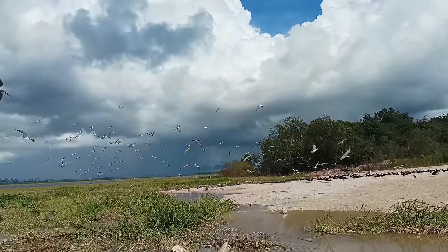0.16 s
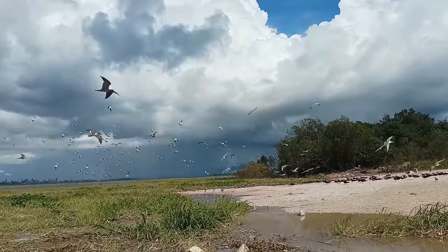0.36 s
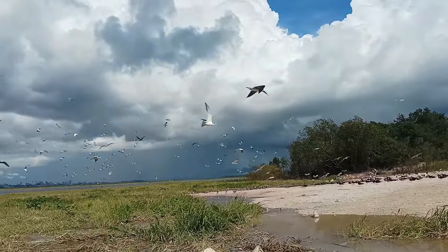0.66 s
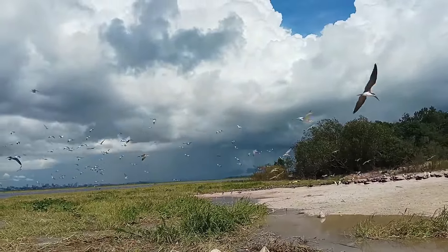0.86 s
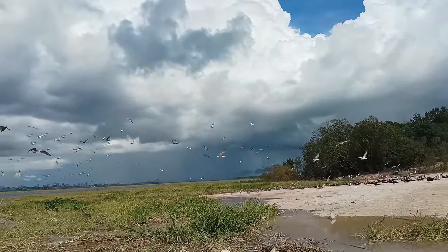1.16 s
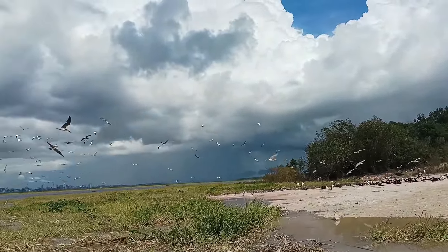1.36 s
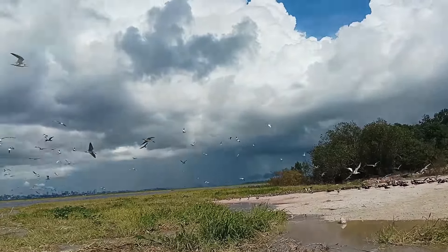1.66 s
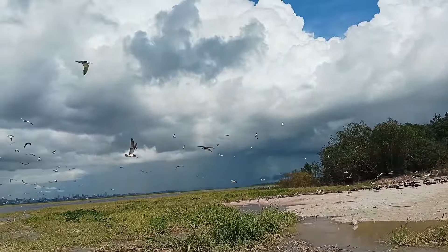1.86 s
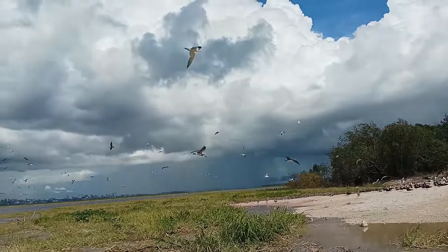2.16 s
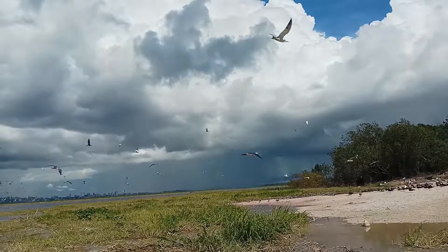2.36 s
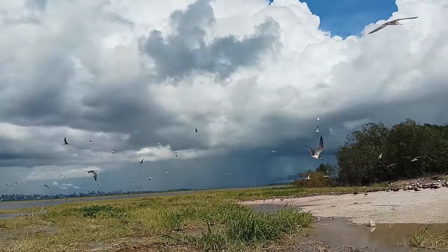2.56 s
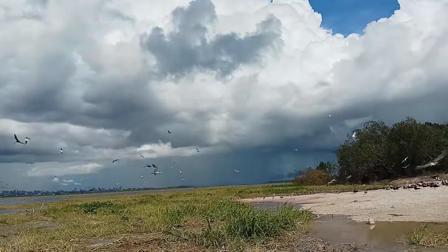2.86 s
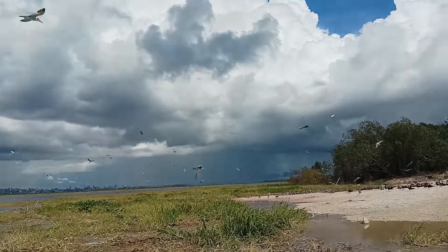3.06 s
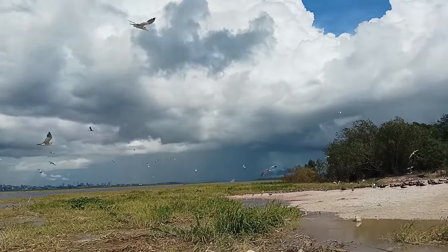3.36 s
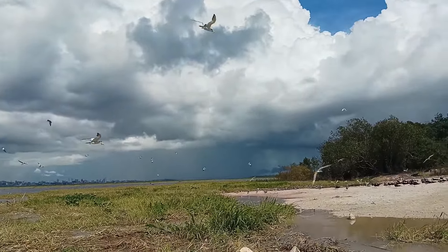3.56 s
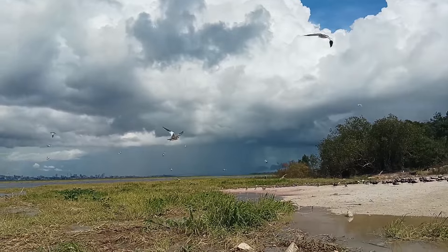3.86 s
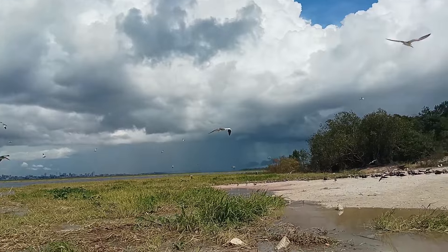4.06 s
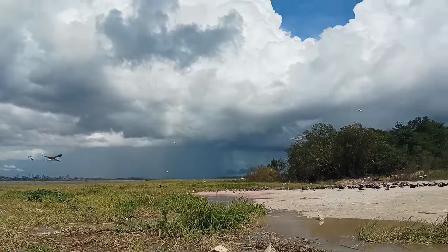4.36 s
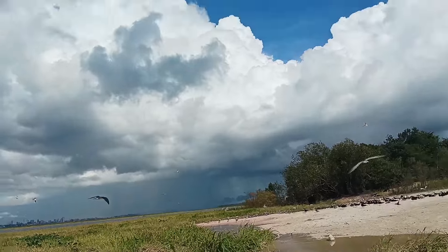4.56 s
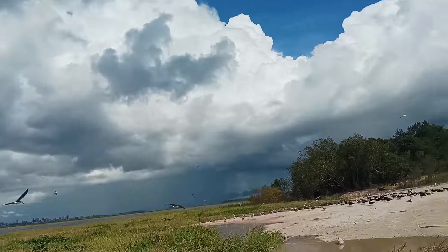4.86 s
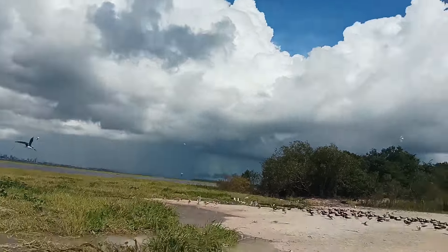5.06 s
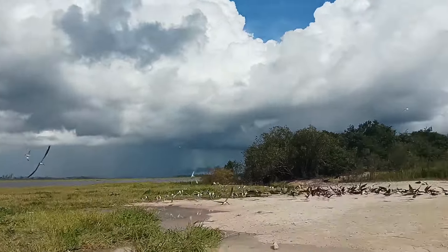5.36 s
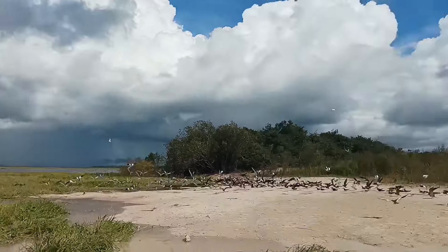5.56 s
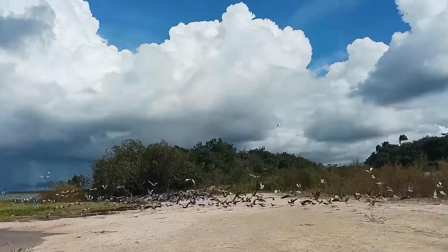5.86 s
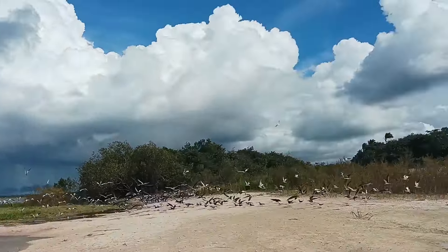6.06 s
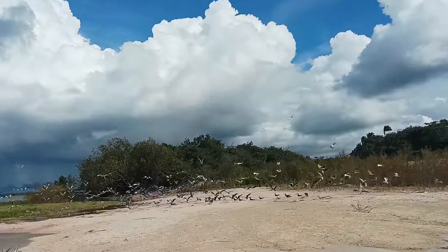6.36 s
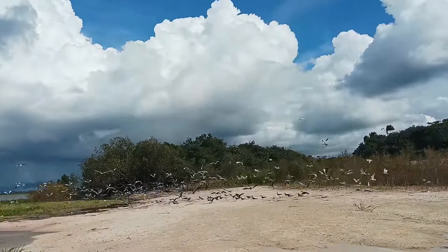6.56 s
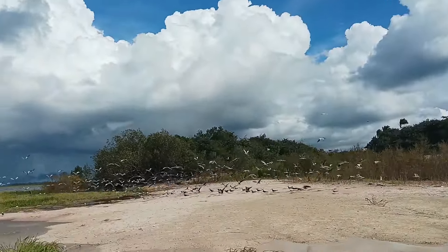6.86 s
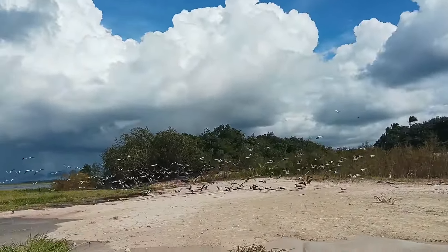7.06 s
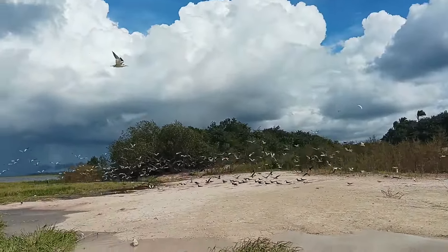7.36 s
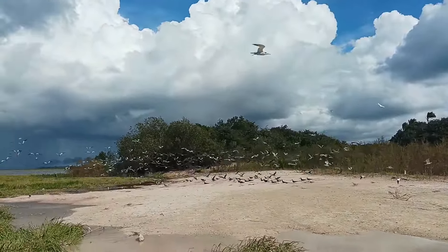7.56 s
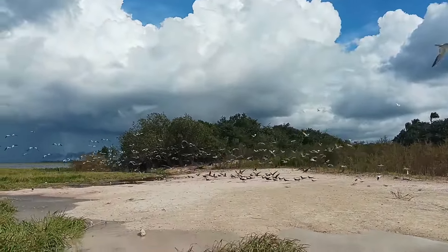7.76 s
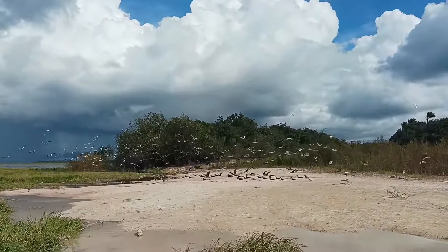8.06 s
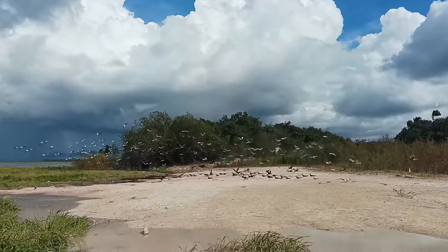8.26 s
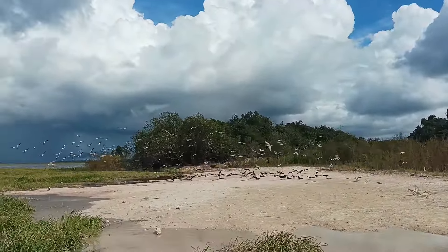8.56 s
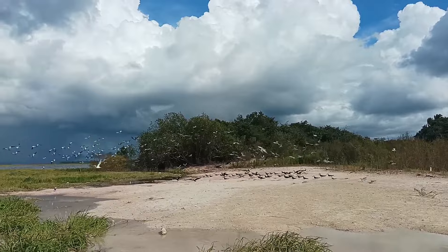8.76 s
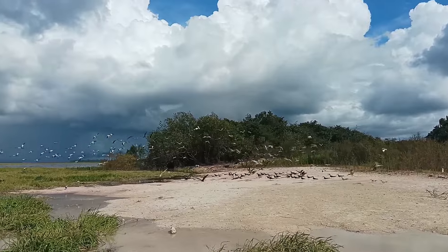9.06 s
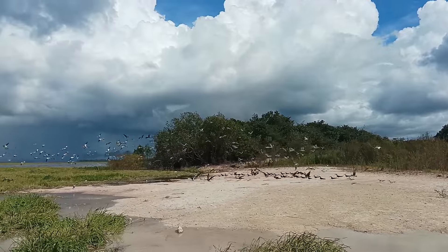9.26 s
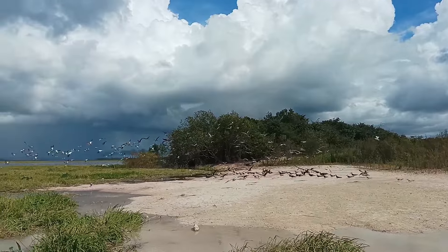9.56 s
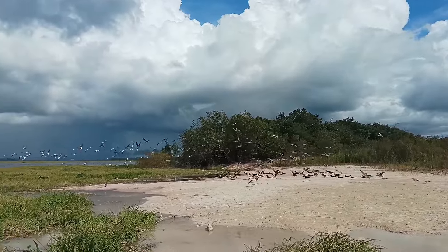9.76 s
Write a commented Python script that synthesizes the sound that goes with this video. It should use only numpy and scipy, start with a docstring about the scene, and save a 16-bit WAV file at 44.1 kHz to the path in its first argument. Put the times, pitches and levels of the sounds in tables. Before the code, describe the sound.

An open, almost echo-free river bank with a flock of terns and waterbirds, about ten seconds. Wind rumbles low throughout in irregular gusts, with dull thumps on the microphone. Over it come short thin whistles around 4 kHz, slightly lower pipes, nasal cries near 1 kHz, hoarse rising yelps and faint distant calls. Wavering whistles glide up and down at 0.3, 0.8, 1.1, 1.5 and 2.3 s. From 3 to 5 s whistles get busier, with strong wavering calls at 4.1 and 4.7 s, while buffeting peaks from 3.6 to 5 s. Dry crackling brushes pass close by at 4.7 and 5.4-6 s, with two soft faint coos around 6 s. Another hard thump lands at 7.2 s, then cries and a wavering call at 8.1 s. A throaty rattle sounds at 9.1-9.4 s amid cries; whistles and wind continue to the end. Faint high insect buzz and hiss lie beneath.

```python
"""Terns and other waterbirds call over an open river bank: pitch arches drive whistles, piping notes and coos,
gliding pitch makes wavering calls, and harmonics through a throat make cries, yelps and a rattle. Fainter
birds, pulsed insect buzzes and a steady hiss of air, all from sines or shaped noise, lie behind. Gusts rumble
as shaped noise and eddies thump as pressure spikes on the microphone; grainy bursts of crackling noise swell
and die away close by."""
import sys
import numpy as np
from scipy import signal
from scipy.fft import rfft, irfft
from scipy.io import wavfile
from scipy.ndimage import uniform_filter1d

SR = 44100
rng = np.random.default_rng(int(sys.argv[2]) if len(sys.argv) > 2 else 0)


def store_wav(level_fs):
    """Save 16-bit WAV to argv[1]."""
    pcm = np.round(np.clip(np.atleast_2d(level_fs), -1, 1) * 32767)
    wavfile.write(sys.argv[1], SR, pcm.T.astype(np.int16))


N = 437031
TIME = np.arange(N) / SR

# Call levels stand before the gain of their kind in near_birds(); pitches before sag and unsteadiness.
# Pitch arches of thin whistles: start_s, length_s, first_hz, top_hz, last_hz,
# top_at (share of the length, held to 0.1-0.9), level_db, overtone_db (second harmonic, relative)
WHISTLE_ARCHES = [(0.023, 0.12, 3900, 4100, 3340, 0.42, -60.5, -49),
                  (0.386, 0.031, 3935, 4030, 3700, 0.3, -46.5, -41),
                  (0.51, 0.17, 3870, 4090, 4020, 0.36, -47, -20),
                  (0.55, 0.21, 4230, 4153, 3680, 0, -53.5, -21),
                  (0.793, 0.2, 4240, 4350, 4030, 0.6, -60, -19),
                  (1.83, 0.098, 3880, 4090, 3840, 1, -43.5, -10),
                  (1.958, 0.051, 3720, 4180, 4450, 1, -50.5, -42),
                  (2.093, 0.11, 4220, 4340, 4100, 0.22, -54, -19),
                  (2.178, 0.14, 3989, 4180, 3600, 0.6, -49, -14.5),
                  (2.634, 0.16, 4100, 4120, 3845, 0.28, -54.5, -37),
                  (3.268, 0.39, 3850, 4680, 3946, 0.34, -45, -11),
                  (3.466, 0.13, 4080, 4430, 4130, 0.2, -49, -12),
                  (3.64, 0.17, 4090, 4290, 3990, 0.23, -54.5, -4.5),
                  (3.754, 0.14, 4100, 4060, 3720, 0, -46.5, -9),
                  (3.937, 0.074, 4190, 4280, 3680, 0.47, -57, -16),
                  (4.09, 0.35, 3780, 4240, 4180, 0.1, -66, -10),
                  (4.788, 0.29, 4090, 4714, 4060, 0.23, -48.5, -10.5),
                  (5.041, 0.062, 4410, 4330, 3820, 0.37, -49, -9),
                  (5.215, 0.18, 4150, 4470, 3960, 0.3, -48, -5.5),
                  (5.299, 0.056, 4170, 4150, 3760, 0.6, -44, -9.5),
                  (6.191, 0.073, 3850, 4290, 3850, 0.8, -56.5, -10),
                  (6.355, 0.31, 3950, 4120, 3670, 0.3, -62.5, -14),
                  (6.63, 0.32, 4010, 4660, 4180, 0.34, -58, -16),
                  (6.811, 0.04, 3955, 4120, 3570, 1, -51.5, -3.5),
                  (6.974, 0.15, 3940, 4760, 4600, 1, -65.5, -10),
                  (7.127, 0.18, 4110, 3950, 3230, 0.1, -52, -11.5),
                  (7.724, 0.095, 4230, 4290, 3860, 0.2, -60, -15),
                  (8.388, 0.05, 4380, 4390, 4130, 0.3, -54.5, -26),
                  (8.507, 0.052, 3860, 4160, 3640, 0.5, -42, -13),
                  (8.636, 0.16, 3740, 4290, 3580, 0.8, -53, -10.5),
                  (8.793, 0.21, 4030, 3985, 3450, 0.2, -52, -6),
                  (9.044, 0.12, 4165, 4500, 3760, 0.15, -60, -24),
                  (9.472, 0.11, 4340, 4440, 4130, 1, -57.0, -29),
                  (9.66, 0.24, 3930, 4410, 4140, 1, -52.5, -12.5)]
# Pitch arches of piping notes: start_s, length_s, first_hz, top_hz, last_hz, top_at (share), level_db, overtone_db
PIPE_ARCHES = [(0.343, 0.028, 2820, 2880, 2730, 1, -45, -13),
               (0.391, 0.061, 3047, 3110, 2470, 0.12, -55.5, -16),
               (0.49, 0.035, 2750, 2670, 2215, 0.1, -52.5, -26),
               (1.36, 0.048, 2710, 2940, 2920, 1, -46.5, -15.5),
               (1.935, 0.026, 3100, 3093, 2186, 0.058, -46.5, -18),
               (3.191, 0.048, 2700, 3320, 3700, 0.76, -41, -7.5),
               (3.33, 0.13, 3200, 3360, 3210, 0.28, -53, -32),
               (3.629, 0.062, 2960, 3020, 2370, 0.068, -48.5, -13),
               (3.88, 0.058, 2685, 3100, 3000, 1, -54.5, -17),
               (5.021, 0.093, 2740, 3170, 3120, 1, -51.5, -13),
               (5.124, 0.045, 3030, 3030, 2700, 0.13, -50.5, -7),
               (5.55, 0.043, 2770, 3040, 2800, 0.83, -48, -26),
               (8.5, 0.23, 3200, 3180, 2230, 0.071, -57, -8.5),
               (8.875, 0.057, 3300, 3470, 3300, .55, -47.5, -20),
               (9.439, 0.3, 2895, 3090, 3130, 0.2, -61, -21),
               (9.722, 0.076, 2850, 2810, 2880, 0.9, -60.5, -15)]
# Pitch arches of low, soft coos: start_s, length_s, first_hz, top_hz, last_hz, top_at (share), level_db, overtone_db
COO_ARCHES = [(5.9, .09, 609, 638, 564, 0.44, -57, -34), (6.13, .07, 612, 633, 635, 0.55, -54, -29)]
# Pitch arches of nasal cries: start_s, length_s, first_hz, top_hz, last_hz, top_at (share), level_db,
# overtone_db (sets the upper harmonics in throat())
CRY_ARCHES = [(0.09, 0.25, 1118, 1176, 1050, 0.83, -56, -4), (0.375, 0.057, 1050, 1022, 974, 0.1, -61, -3),
              (0.58, 0.29, 1080, 1084, 1072, 0.11, -65.5, -5.5),
              (1.64, 0.082, 1090, 1204, 1020, 0.5, -59.5, -0.5),
              (1.96, 0.13, 1140, 1108, 976, 0.3, -58, -8), (2.076, 0.041, 798, 896, 870, 0.93, -50.5, -11),
              (2.109, 0.084, 1032, 1138, 1007, 0.65, -45, -16), (2.22, 0.1, 787, 883, 880, 0.86, -59.5, -9),
              (2.322, 0.12, 1080, 1123, 1037, 0.19, -47.5, -13.5),
              (2.75, 0.1, 1005, 1173, 835, 0.66, -56, -9), (2.92, 0.27, 1054, 1100, 849, 0.2, -57.5, -8),
              (3.25, 0.28, 1080, 1093, 910, 0.14, -58, -3), (3.49, 0.083, 1124, 1190, 1110, 0.7, -58.5, 2),
              (3.7, 0.22, 1137, 1142, 1070, 0.33, -61.5, -5),
              (5.729, 0.22, 1189, 1184, 1112, 0.16, -56, -11),
              (6.951, 0.066, 1197, 1314, 1320, 1, -62, -0.5),
              (7.3, 0.071, 1096, 1182, 1030, 0.69, -51, -10.5),
              (7.401, 0.097, 795, 963, 964, 0.98, -57.5, -11),
              (7.49, 0.23, 1139, 1154, 1032, 0.47, -51, -9.5),
              (8.872, 0.09, 1097, 1175, 1004, 0.56, -56.5, -2),
              (9.012, 0.075, 830, 972, 950, 1, -55.5, -8.5),
              (9.08, 0.27, 1133, 1168, 1048, 0.084, -58.5, 3),
              (9.33, 0.22, 1266, 1274, 1110, 0.17, -54.5, 1.5)]
# Short hoarse yelps that rise: start_s, length_s, final_hz, level_db, overtone_db (as for the cries)
YELPS = [(0.017, 0.054, 1028, -61.5, -9), (0.255, 0.0282, 1150, -52.5, -1), (0.824, 0.057, 690, -54.5, -9),
         (1.077, 0.03, 1196, -54, -5.5), (1.497, 0.023, 1108, -41, -20), (1.92, 0.029, 1096, -58, -15),
         (3.462, 0.027, 1081, -49.5, -21), (4.986, 0.032, 1037, -59, -4), (5.176, 0.038, 1120, -61, 5.5),
         (5.285, 0.017, 1058, -60.5, 4.5), (5.865, 0.051, 644, -61, -30), (6.021, 0.016, 492, -64, -30),
         (6.088, 0.034, 347, -62.5, -41), (6.148, 0.047, 799, -63.5, -6.5), (6.793, 0.011, 1056, -60.5, -1),
         (7.283, 0.035, 988, -60, -5), (8.423, 0.017, 1180, -56.5, -21), (8.491, 0.017, 1050, -58, 3.5),
         (8.853, 0.032, 963, -53.5, -10)]
# Long unbroken calls through several turns: overtone_db (mean octave level), [(time_s, pitch_hz, level_db), ..]
WAVERING_CALLS = [(-77, [(0.283, 4130, -39.5), (0.335, 4660, -50), (0.4, 4180, -55), (0.48, 4420, -58.5),
                  (0.6, 4160, -49)]), (-64.5, [(0.79, 2700, -48), (0.9, 3470, -82), (0.972, 2840, -67),
                  (1.065, 3200, -69), (1.14, 2560, -53), (1.21, 2330, -57)]), (-78, [(1.112, 4080, -42),
                  (1.16, 4530, -46), (1.24, 4300, -57.5), (1.29, 4430, -55), (1.35, 4120, -48),
                  (1.41, 3950, -52)]), (-62, [(1.525, 4570, -42), (1.555, 4530, -46), (1.605, 3810, -51.5),
                  (1.71, 4520, -51), (1.81, 3910, -47)]), (-58, [(2.325, 2714, -41), (2.395, 3470, -51),
                  (2.495, 2780, -57), (2.59, 3450, -66), (2.66, 2575, -45.5), (2.712, 2300, -45)]),
                  (-59.5, [(4.085, 2575, -45.5), (4.115, 2970, -34), (4.168, 3420, -63), (4.245, 2780, -54),
                  (4.335, 3300, -64), (4.4, 2480, -46), (4.46, 2190, -52.5)]), (-50, [(4.668, 2780, -40),
                  (4.695, 3220, -32), (4.715, 3650, -56), (4.742, 2890, -39), (4.775, 3220, -54)]),
                  (-61, [(5.43, 4040, -47), (5.525, 4410, -50), (5.62, 3880, -46.5), (5.68, 4030, -52),
                  (5.745, 3590, -53), (5.92, 3320, -63)]), (-58.5, [(6.53, 2880, -43), (6.577, 3276, -47),
                  (6.607, 2770, -52), (6.635, 2980, -52)]), (-88, [(6.68, 3060, -64), (6.78, 3010, -62.5),
                  (6.88, 2990, -59), (6.96, 2900, -58)]), (-86, [(7.73, 2790, -57), (7.82, 2900, -67),
                  (7.935, 2690, -69), (7.975, 2910, -50), (8, 3170, -71), (8.04, 2870, -74),
                  (8.09, 2940, -63)]), (-58, [(8.1, 2645, -43), (8.17, 3440, -62), (8.24, 2770, -60),
                  (8.33, 3400, -68), (8.39, 3130, -52), (8.425, 2510, -57), (8.48, 2350, -57)])]
# One long rattling call: start_s, length_s, first_hz, top_hz, last_hz, top_at (share), level_db
RATTLE_ARCH = (9.12, .27, 900, 968, 830, .7, -49)
# Resonance of the throat of the crying, yelping and rattling birds: frequency_hz, gain_db
THROAT_RESPONSE = [(600, -13.5), (1100, -13), (1600, 1), (2150, 2.5), (2700, -2.5), (3400, -2.5),
                   (4400, -11.5), (5700, -1.5), (7000, -10.5), (8200, -20.5), (10000, -24), (11500, -43)]
# How well a whistled pitch carries, relative within a call: pitch_hz, gain_db
PITCH_CARRY = [(2200, 2.5), (2500, -4.5), (2900, -2), (3400, -3.5), (3700, -1), (4050, 3), (4300, 2),
               (4550, 5.5), (4800, -2)]
# Spectrum of the wind rumble, relative: frequency_hz, density_db (per Hz)
RUMBLE_SPECTRUM = [(25, -32), (60, -2.5), (95, 4.5), (190, 2.5), (300, -5.5), (450, -25.5), (700, -55),
                   (2000, -100)]
# Steady breeze between the gusts, before wind() shapes it: time_s, level_db
BREEZE_LEVEL = [(0, -33), (.58, -51), (1.3, -28), (1.72, -42), (2.7, -32), (3.5, -36.5), (4.3, -32),
                (5.3, -33), (6, -36), (7, -36), (7.7, -35), (8.9, -34.5), (9.45, -47.5), (9.9, -24.5)]
# Gusts on the microphone, before wind() shapes them: start_s, length_s, level_db
GUST_EVENTS = [(0, 0.18, -26), (0.446, 0.042, -28), (0.645, 0.084, -31), (0.772, 0.082, -26.5),
               (1.1, 0.084, -29.5), (1.464, 0.12, -27), (1.785, 0.037, -34), (1.892, 0.1, -25.5),
               (2.113, 0.11, -26), (2.295, .2, -27), (2.697, 0.25, -30.5), (2.983, 0.21, -27),
               (3.26, 0.17, -28.5), (3.456, 0.075, -25.5), (3.587, 0.062, -26), (3.688, 0.076, -22),
               (3.783, 0.22, -28), (4.049, 0.11, -24), (4.168, 0.063, -21.5), (4.213, 0.18, -22.5),
               (4.473, 0.31, -21), (4.791, 0.085, -18), (4.864, 0.14, -23.5), (5.04, 0.18, -26),
               (5.269, 0.3, -25), (5.653, 0.1, -27.5), (5.806, 0.063, -24), (6.094, 0.092, -27),
               (6.194, 0.261, -24.5), (6.53, 0.38, -30), (6.8, 0.051, -24.5), (6.921, 0.13, -23.5),
               (7.07, 0.22, -23.5), (7.283, 0.15, -32), (7.558, 0.041, -28.5), (7.796, 0.024, -25),
               (7.878, 0.035, -24), (8.052, 0.18, -30), (8.315, 0.37, -31.5), (8.694, 0.11, -27.5),
               (8.826, 0.24, -26), (9.149, 0.26, -29.5), (9.47, 0.14, -29), (9.622, 0.38, -32.5)]
# Single eddies that hit the microphone, before its bass cut and overload: time_s, peak_db, centre_hz
EDDIES = [(0.099, -10.5, 178), (0.837, -11, 166), (1.096, -16.5, 189), (1.115, -14, 163),
          (1.393, -10.5, 190), (1.547, -10.5, 169), (1.923, -17.5, 249), (2.322, -10, 212),
          (2.404, -12, 233), (2.426, -12.5, 268), (2.492, -9.5, 227), (2.776, -10, 184), (3.022, -7.5, 209),
          (3.072, -7, 267), (3.618, -8.5, 149), (3.69, -5.5, 297.4), (3.902, -4, 166), (3.985, -7.5, 219),
          (4.062, -13, 208), (4.11, -4.5, 214), (4.212, -3.5, 202), (4.35, -7, 270), (4.377, -7, 242),
          (4.476, -9.5, 240), (4.534, -7, 250), (4.605, -7.5, 284), (4.799, -4, 200), (4.864, -1.5, 450),
          (4.967, -8.5, 270), (5.821, -15, 150), (6.109, -16, 248), (6.131, -16.5, 240),
          (6.292, -11.5, 208), (6.346, -14, 220), (6.384, -17, 265), (6.43, -13.5, 283), (6.579, -14, 281),
          (6.637, -11, 210), (6.817, -6, 220), (6.948, -9.5, 216), (7.089, -15, 272), (7.167, -3.5, 230),
          (8.768, -7, 192), (9.048, -10.5, 180)]
# Grainy noise bursts close by, before a common trim: peak_s, rise_s, fall_s (each spans 20 dB), # level_db,
# treble_db (relative to the body)
BURSTS = [(4.69, .085, 0.095, -38, 4), (5.46, 0.07, .08, -46, -20), (5.526, 0.006, 0.025, -42, 0),
          (5.575, 0.055, 0.15, -42.5, -4), (5.67, .075, .08, -37.5, -16), (5.9, 0.09, 0.16, -50, -22)]
# Spectrum of the grainy bursts, relative: frequency_hz, density_db (per Hz)
BURST_SPECTRUM = [(400, -0.5), (1000, -0.5), (1500, -1), (2200, -1.5), (3200, 0), (4600, -11.5),
                  (6000, -2.5), (9000, -10), (12000, -21.5), (15500, -21)]
# Spectrum of the hiss of the open air, relative: frequency_hz, density_db (per Hz)
AIR_SPECTRUM = [(900, 7), (1500, 1), (3000, -1), (5000, -5), (8600, -7), (11000, -10), (12000, -13),
                (15500, -14)]
# Insects in the grass: start_s, end_s, pitch_hz, level_db, strokes_per_s (wing strokes)
INSECT_BUZZES = [(0, 9.95, 9600, -72, 47), (0, 1.8, 10250, -72.5, 39)]

AIR_DB, EDGE_HZ, BANK_T60_S = -69, 15700, .33
GUST_RISE_S, GUST_FALL_S = .012, .023
# level of the nearest distant bird, loss of its overtones on the way, and hoarseness of distant cries
FAR_DB, FAR_DULL_DB, FAR_HISS_DB = -58, 7, -19
SAG = .016  # share by which the pitch sags at both ends of a call
CRY_FADE_DB, PIPE_FADE_DB, WHISTLE_FADE_DB = 1.5, -2.5, 1  # loss over a call (negative: it swells)
WHISTLE_JITTER, CRY_JITTER = .0028, .003  # fast unsteadiness of pitch, as a share
CRY_HISS_DB = -22  # hoarseness at the start of a cry
GLIDE_S = .02  # time over which a wavering pitch rounds a turn
OVERTONE_FOLLOWS = .52  # share of a wavering call's swings of level that its overtone follows
RASP_RISE = .17  # share of its final pitch by which a yelp climbs
RASP_HISS_DB, RASP_HARSHENING_DB = -21, 16  # hoarseness at the start of a yelp, and its growth
SNAP_S, SNAP_DB = .002, 4  # crack ending a yelp: time scale; level over the yelp before half its overtone_db
RATTLE_HZ, RATTLE_THROB_DB = 43.6, 2.5  # pulse rate, and swing of level on each pulse
RATTLE_SWELL_DB = 10  # rise of level toward the top of the arch


def amp(db):
    """Logarithmic level: converts decibels to an amplitude ratio."""
    return 10 ** (np.asarray(db) / 20)


def unit(x):
    """Power normalisation: scales a signal to rms 1."""
    return x / np.sqrt(np.mean(x ** 2) + 1e-20)


def read(points, hz):
    """Logarithmic frequency scale: interpolates a spectrum in dB."""
    f, db = np.transpose(points)
    return np.interp(np.log(hz + 1), np.log(f + 1), db)


def add(mix, s, sound):
    """Superposition: adds a sound to the mix from time s."""
    part = mix[max(0, round(s * SR)):][:len(sound)]
    part += sound[:len(part)]


def noise(colour):
    """Spectral shaping: white noise weighted by a spectrum, at rms 1."""
    spectrum = rfft(rng.standard_normal(N))
    gain = amp(read(colour, np.fft.rfftfreq(N, 1 / SR)))
    return unit(irfft(spectrum * gain, N))


def wander(t, rate_hz):
    """Band-limited randomness: sines of random phase, none above the rate, sum to about rms 1."""
    hz = rate_hz * np.geomspace(.2, 1, 12)[:, None]
    chance = rng.random((12, 2))
    phase, detune = chance[:, :1], 1 - chance[:, 1:] / 10
    return np.sin(2 * np.pi * (hz * detune * t + phase)).sum(0) / np.sqrt(len(hz) / 2)


def band(x, hz, kind, order=2):
    """Zero-phase filtering: low-pass or high-pass run forward and backward, without delay."""
    sos = signal.butter(order, min(hz, SR / 2 - 100), kind, fs=SR, output="sos")
    return signal.sosfiltfilt(sos, x)


def air():
    """Broadband noise: a faint steady hiss of the open air."""
    return amp(AIR_DB) * noise(AIR_SPECTRUM)


def insects():
    """Amplitude modulation: wing strokes pulse a narrow treble band of noise into a thin buzz."""
    out = np.zeros(N)
    for start, end, hz, db, strokes in INSECT_BUZZES:
        buzz = noise([(hz * .8, -45), (hz * .94, -9), (hz, 0), (hz * 1.04, -9), (hz * 1.11, -45)])
        singing = uniform_filter1d(1. * (TIME >= start) * (TIME < end), size=3000)
        pulses = 1 + .24 * np.sin(2 * np.pi * strokes * TIME + wander(TIME, 2.6))
        out += amp(db) * singing * buzz * pulses
    return out


def wind_level():
    """Addition of powers: the breeze plus gusts that rise, hold and fall, in dB."""
    power = amp(np.interp(TIME, *np.transpose(BREEZE_LEVEL))) ** 2
    for start, length, db in GUST_EVENTS:
        gate = np.minimum((TIME - start) / GUST_RISE_S, (start + length - TIME) / GUST_FALL_S)
        power += (amp(db) * np.clip(gate + .5, 0, 1)) ** 2
    return 10 * np.log10(power)


def wind():
    """Turbulence: lumpy low noise, over which small eddies roar more as it blows harder."""
    level_db = wind_level()
    lumps_db = 2 * wander(TIME, 45)
    rumble = noise(RUMBLE_SPECTRUM) * amp(level_db + lumps_db - 1)
    roar = noise([(150, -8), (350, 13), (650, -7.5), (950, -26), (1500, -34.5), (6000, -55.5)])
    # the roar grows 2.71 dB for each dB of wind
    roar_db = -34 + 2.71 * (level_db + 22.5) + 2.77 * lumps_db
    return rumble + roar * amp(roar_db)


def buffets():
    """Impulse response: the microphone's bass cut turns each eddy's pressure spike into a short thump."""
    out, t = np.zeros(N), np.arange(-1500, 1500) / SR
    bass_cut = signal.butter(2, 70, "high", fs=SR, output="sos")
    for s, db, hz in EDDIES:
        spike = ((1 + 2j * np.pi * hz * t / 3) ** -4).real  # its spectrum peaks at hz
        add(out, s + t[0], amp(db) * spike)
    return signal.sosfilt(bass_cut, out)


def overload(x):
    """Saturation: the hardest blows on the microphone bend toward a ceiling of 0.85."""
    return x / (1 + (x / .85) ** 6) ** (1 / 6)


def grainy_bursts():
    """Granular noise: dense noisy crackle swells and dies away in each burst."""
    grain = noise(BURST_SPECTRUM) * amp(2.4 * wander(TIME, 160) + 1.5 * wander(TIME, 50))
    grain = unit(grain)
    # the body crunches in clumps, each band on its own
    clumps = np.zeros(N)
    for hz in 1400 * 1.3 ** np.arange(4):
        below = band(noise(BURST_SPECTRUM), hz * 1.17, "low", order=4)
        clumps += band(below, hz, "high", order=4) * amp(2 * wander(TIME, 70))
    body = .6 * band(grain, 4500, "low") + .55 * unit(clumps)
    treble = band(grain, 4500, "high")
    out = np.zeros(N)
    for s, rise_s, fall_s, db, treble_db in BURSTS:
        away = np.maximum((s - TIME) / rise_s, (TIME - s) / fall_s)
        swell = amp(db - 20 * np.minimum(away, 10) ** 1.8)
        out += swell * (body + amp(treble_db) * treble)
    return amp(-3.5) * out


def bank(x):
    """Diffuse reflection: sparse decaying echoes as faint scatter from the sand and the tree line."""
    t = np.arange(SR) / SR
    echoes = rng.standard_normal(SR) * (rng.random(SR) < 2000 / SR)  # about 2000 per s
    taps = echoes * amp(-60 * t / BANK_T60_S) * (t > .006)
    tail = band(taps, 8000, "low", order=1)
    return signal.fftconvolve(x, tail / np.linalg.norm(tail))[:N]


def far_birds(count=132, spread_db=10):
    """Attenuation with distance: short, faint, dulled calls at random times and pitches."""
    out = np.zeros(N)
    for k, (when, which, size, distance, pace) in enumerate(rng.random((count, 5))):
        kind = (WHISTLE_ARCHES, PIPE_ARCHES, CRY_ARCHES, PIPE_ARCHES)[k % 4]
        _, _, *pitches, top_at, _, overtone_db = kind[int(which * len(kind))]
        start = (k + when) / count * N / SR
        length = .03 + .1 * pace ** 2
        pitches = np.multiply(pitches, .84 + .2 * size)
        level_db = FAR_DB - spread_db * distance
        call = (start, length, *pitches, top_at, level_db, min(overtone_db, -6) - FAR_DULL_DB)
        if kind is CRY_ARCHES:
            sound = cry(call, CRY_FADE_DB, CRY_JITTER, FAR_HISS_DB, harshening_db=0, edge_s=.02)
        else:
            sound = whistle(call, WHISTLE_FADE_DB, third_db=-26.5, fall_db=15, jitter=WHISTLE_JITTER,
                            flutter_db=1.5)
        add(out, *sound)
    return out


def syrinx(arch, fade_db, jitter, jitter_hz, flutter_db, edge_s):
    """Pressure-driven oscillation: an unsteady pitch arch that sags at both ends, with its loudness."""
    start, length, first_hz, top_hz, last_hz, top_at, db = arch
    t = np.arange(start - edge_s / 2, start + length + edge_s / 2, 1 / SR)
    u, top_at = (t - start) / length, np.clip(top_at, .1, .9)
    climb = np.clip(1 - u / top_at, 0, 1.1)
    drop = np.clip((u - top_at) / (1 - top_at), 0, 1.1)
    pitch = top_hz - (top_hz - first_hz) * climb ** 2 - (top_hz - last_hz) * drop ** 2
    inside = np.clip(np.minimum(t - t[0], t[-1] - t) / edge_s, 0, 1)
    # the pitch sags where the air pressure is low, at both ends
    pitch = pitch * (1 + jitter * wander(t, jitter_hz) + .004 * wander(t, 30) - SAG * (1 - inside) ** 2)
    loud = np.sin(np.pi / 2 * inside) ** 2 * amp(-fade_db * u + flutter_db * wander(t, 55))
    return t, pitch, amp(db) * unit(loud)


def throat(t, pitch, overtone_db, hiss_db):
    """Source and filter: throat resonance weights a harmonic stack; noise about each partial is hoarse."""
    phase = 2 * np.pi * np.cumsum(pitch) / SR
    voice = np.zeros(len(t))
    for k in range(1, 14):
        # the overtone level acts from 3000 Hz and is full at 5200 Hz
        bright_db = (overtone_db + 4.5) * np.clip((k * pitch - 3000) / 2200, 0, 1)
        angle = k * phase + k ** 2
        partial = np.sin(angle) + amp(hiss_db) * wander(t, 520) * np.cos(angle)
        voice += amp(read(THROAT_RESPONSE, k * pitch) + bright_db + 4.07 * wander(t, 9)) * partial
    return voice


def rattle():
    """Periodic modulation: rapid pulses, each a bright small pitch arch, dull and hoarse between."""
    t, pitch, loud = syrinx(RATTLE_ARCH, 0, .014, 300, 1, .018)
    start, length, _, _, _, top_at, _ = RATTLE_ARCH
    swell = np.interp(t, [t[0], start + length * top_at, t[-1]], [0, 1, 0])
    loud = loud * unit(amp(RATTLE_SWELL_DB * swell))
    beat = np.cos(2 * np.pi * RATTLE_HZ * (t - 9.218) + .5 * wander(t, 30))
    bright_db = -14 + np.sqrt(loud / loud.max()) * (6 + 10 * np.tanh(3 * beat - .5))
    pulse_arch = 1 + .025 * beat + .012 * wander(t, 60)
    hoarse_db = -9 - 5 * beat
    throb = unit(amp(RATTLE_THROB_DB * beat))
    return t[0], loud * throb * throat(t, pitch * pulse_arch, bright_db, hoarse_db)


def cry(call, fade_db, jitter, hiss_db, harshening_db, edge_s):
    """Resonant voicing: a nasal harmonic call whose hoarseness may grow toward its end."""
    *arch, overtone_db = call
    t, pitch, loud = syrinx(arch, fade_db, jitter, 240, .95, edge_s)
    growing_hiss_db = hiss_db + harshening_db * np.linspace(0, 1, len(t))
    return t[0], loud * throat(t, pitch, overtone_db, growing_hiss_db)


def rasp(start, length, hz, db, overtone_db):
    """Voicing breaking into noise: a yelp rises, swells, turns hoarse and ends in a crack."""
    call = (start, length, hz * (1 - RASP_RISE), hz, hz, 1, db, overtone_db)
    s, voice = cry(call, fade_db=-2, jitter=.007, hiss_db=RASP_HISS_DB,
                   harshening_db=RASP_HARSHENING_DB, edge_s=.014)
    t = s + np.arange(len(voice)) / SR
    crack = band(rng.standard_normal(len(t)), 1500, "high")
    crack = unit(band(crack, 9500, "low", order=4))
    snap = np.exp(-((t - start - length + SNAP_S) / SNAP_S) ** 2)
    return s, voice + crack * amp(db + SNAP_DB + overtone_db / 2) * snap


def waver(overtone_db, points):
    """Frequency modulation: one unbroken whistle glides through its turns, with two overtones."""
    s, hz, db = np.transpose(points)
    edge_s = .012
    t = np.arange(s[0] - edge_s / 2, s[-1] + edge_s / 2, 1 / SR)
    pitch = uniform_filter1d(np.interp(t, s, hz), round(GLIDE_S * SR), mode="nearest")
    unsteady = 1 + .0029 * wander(t, 260) + .0027 * wander(t, 30)
    phase = 2 * np.pi * np.cumsum(pitch * unsteady) / SR
    level_db = np.interp(t, s, db) + 1.2 * wander(t, 55)
    octave_db = overtone_db + OVERTONE_FOLLOWS * (level_db - db.mean()) + 4.9 * wander(t, 25)
    overtones = amp(octave_db) * (np.sin(2 * phase) + amp(-16) * np.sin(3 * phase))
    voice = amp(level_db) * np.sin(phase) + overtones
    return t[0], np.sqrt(2) * voice * np.clip(np.minimum(t - t[0], t[-1] - t) / edge_s, 0, 1)


def whistle(call, fade_db, third_db, fall_db, jitter, flutter_db):
    """Near-sinusoidal oscillation: a strong fundamental with three overtones."""
    *arch, overtone_db = call
    t, pitch, loud = syrinx(arch, fade_db, jitter, 260, flutter_db, edge_s=.026)
    phase = 2 * np.pi * np.cumsum(pitch) / SR
    levels = [overtone_db, overtone_db + third_db, overtone_db + third_db - fall_db]
    overtones = sum(amp(db + 3.5 * wander(t, 22)) * np.sin(k * phase) for k, db in enumerate(levels, 2))
    fundamental = unit(amp(read(PITCH_CARRY, pitch))) * np.sin(phase)
    return t[0], np.sqrt(2) * loud * (fundamental + overtones)


def near_birds():
    """Superposition of voices: the calls that stand out, each kind with its own gain."""
    whistles, pipes, cries, rasps, wavers = np.zeros((5, N))
    for row in WAVERING_CALLS:
        add(wavers, *waver(*row))
    for call in WHISTLE_ARCHES:
        add(whistles, *whistle(call, WHISTLE_FADE_DB, third_db=-33.5, fall_db=3.5, jitter=WHISTLE_JITTER,
                               flutter_db=1.63))
    for call in PIPE_ARCHES:
        add(pipes, *whistle(call, PIPE_FADE_DB, third_db=-11, fall_db=16, jitter=.0022, flutter_db=2.5))
    for call in COO_ARCHES:
        add(pipes, *whistle(call, 0, third_db=-9, fall_db=21, jitter=.01, flutter_db=4.5))
    for call in CRY_ARCHES:
        add(cries, *cry(call, CRY_FADE_DB, CRY_JITTER, CRY_HISS_DB, harshening_db=3, edge_s=.016))
    for row in YELPS:
        add(rasps, *rasp(*row))
    add(rasps, *rattle())
    return wavers + amp(-.5) * whistles + amp(.6) * pipes + amp(3.16) * cries + amp(4) * rasps


def scene():
    """Superposition: birds over the bank, insects, air, grainy bursts, and wind on the microphone."""
    near, far = near_birds(), far_birds()
    birds = near + far + amp(-20) * bank(near + 2 * far)
    gusts = overload(band(wind(), 32, "high") + buffets())
    return (birds + insects() + air() + gusts + grainy_bursts())[None]


def record(dry):
    """Band limitation: the recorder's low-pass, with a soft start and end."""
    dry = dry * signal.windows.tukey(N, .002)
    low_pass = signal.firwin(511, EDGE_HZ, window=("kaiser", 9), fs=SR)
    return signal.oaconvolve(dry, low_pass[None], "same")


dry = scene()
out = record(dry)
store_wav(out)
```